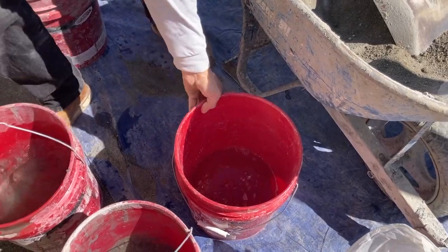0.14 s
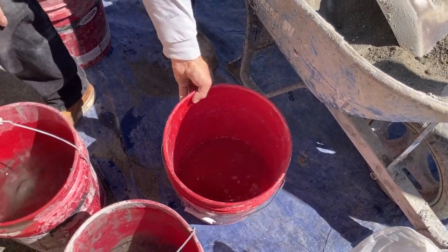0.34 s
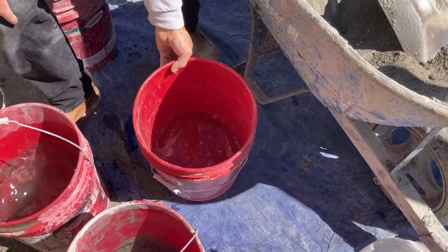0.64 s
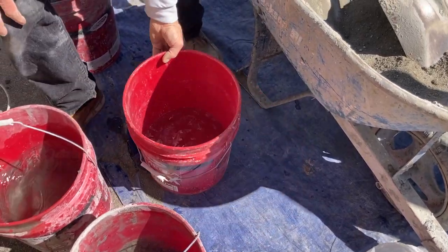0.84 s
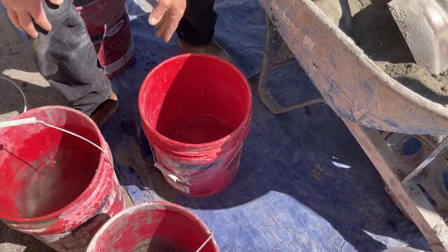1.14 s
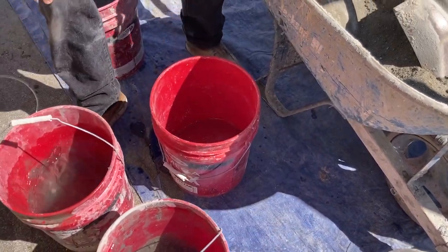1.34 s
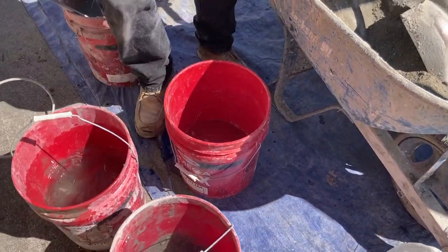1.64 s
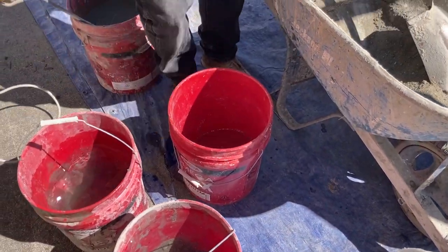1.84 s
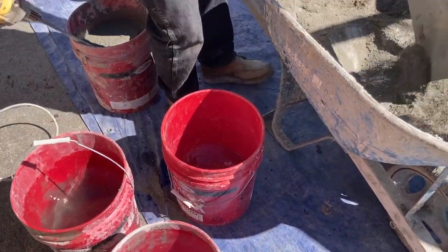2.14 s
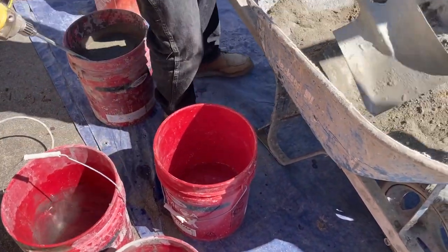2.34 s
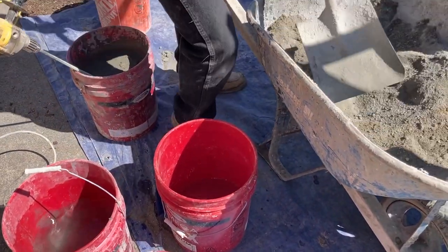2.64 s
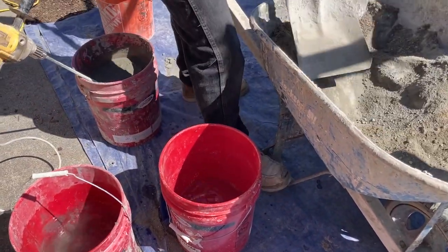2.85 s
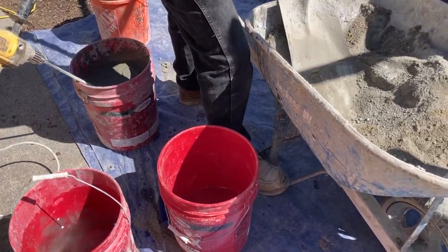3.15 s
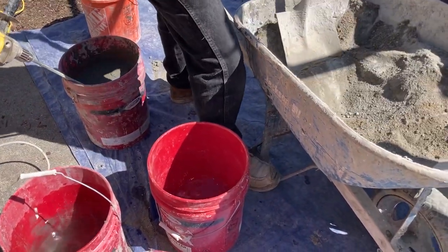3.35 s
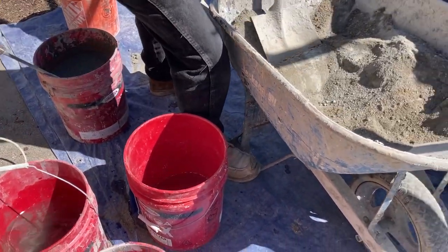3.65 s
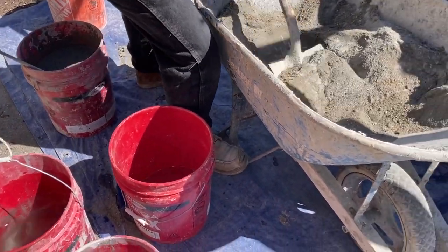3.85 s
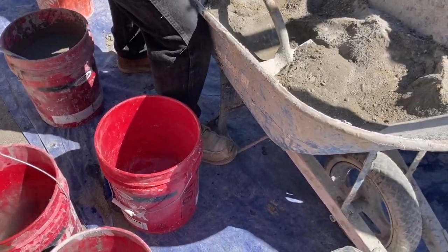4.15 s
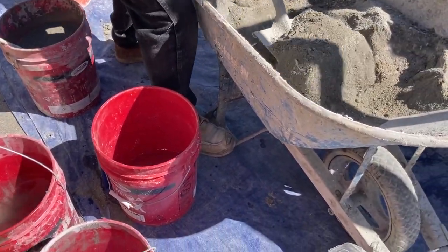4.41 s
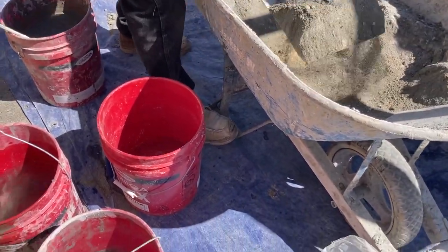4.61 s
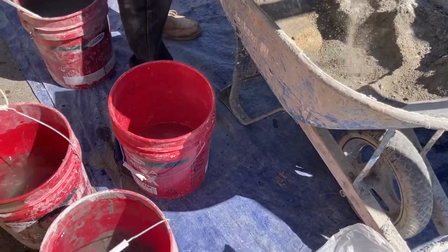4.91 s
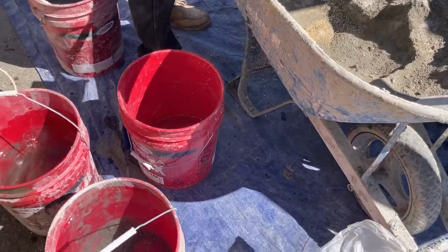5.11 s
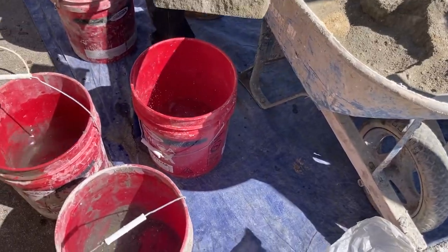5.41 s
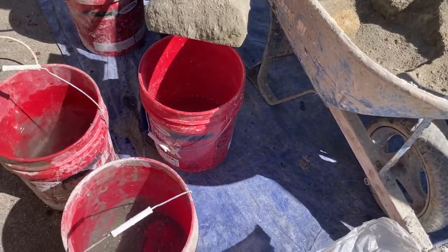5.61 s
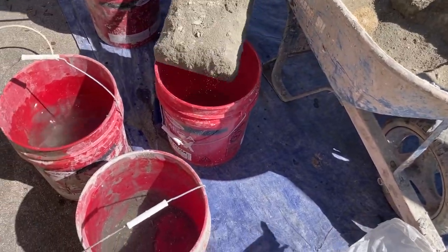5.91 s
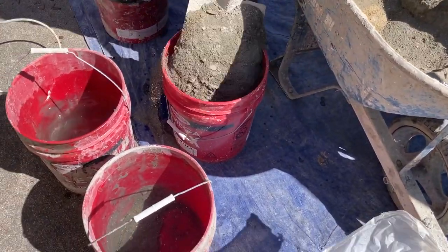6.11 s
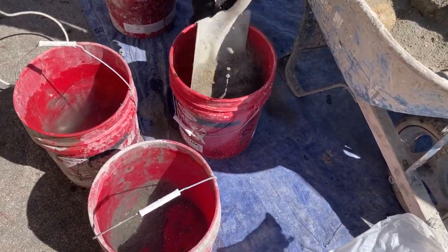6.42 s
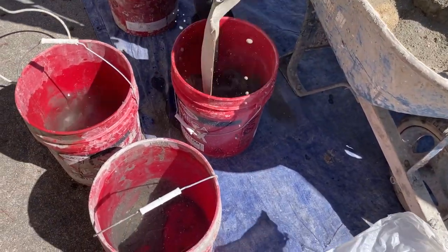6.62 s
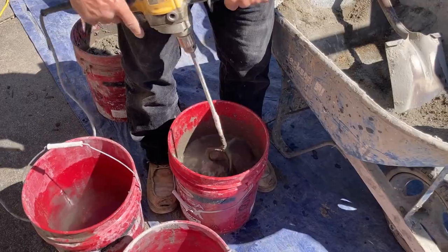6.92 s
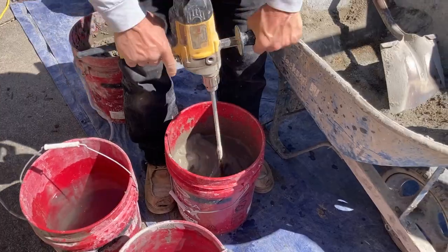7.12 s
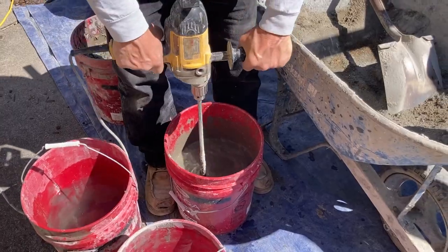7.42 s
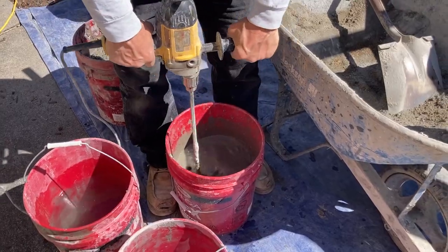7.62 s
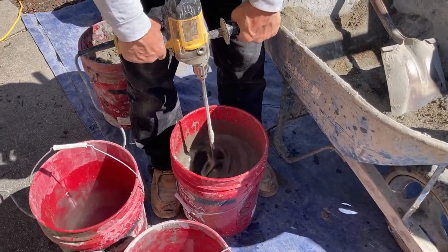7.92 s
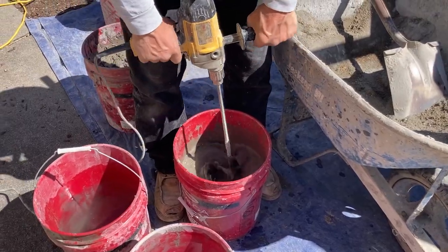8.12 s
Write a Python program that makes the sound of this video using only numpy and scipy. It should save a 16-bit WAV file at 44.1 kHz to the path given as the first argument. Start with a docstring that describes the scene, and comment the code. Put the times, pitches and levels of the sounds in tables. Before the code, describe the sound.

Close, dry outdoor sound with faint distant wash and a low breeze that fades after about 4 s. From 0 to 0.3 s, things scuff over gritty ground. At 0.7 s a plastic bucket lands with a hollow, ringing knock, rocking and settling until 0.93 s. Soft drags and dull thuds follow, with heavier scrapes at 1.7-2.4 s. Around 3.1 s a shovel hits with a loud, overloaded clack and brief squeak, again at 3.26 s, then digs with a coarse crunch at 3.6-3.9 s. A short heave scrapes at 4.65 s; grains click and patter from 5.1 to 5.7 s. At 5.92 s the blade chatters on the bucket rim, and sand slides in at 6.1-6.4 s with wet, boomy plops until 6.8 s. From 6.85 s a drill whirs, slows near 7.5 s, then revs to a peak around 8 s, paddle churning and slapping slurry to the end.

```python
"""Outdoors in a yard, mortar is mixed close to the microphones. A plastic bucket with a little water is
set down on a tarp, a shovel stabs and digs into gritty sand in a wheelbarrow, and the load slides into the
bucket. Then a drill with a mixing paddle runs up and churns the slurry. Scrapes and blows are streams of tiny
clicks and hiss, filtered to sound like each object; squeaks, thuds and gears are tones. Loud peaks overload."""
import sys
import numpy as np
from scipy import signal
from scipy.fft import rfft, irfft
from scipy.io import wavfile
from scipy.ndimage import uniform_filter1d

SR = 44100
rng = np.random.default_rng(int(sys.argv[2]) if len(sys.argv) > 2 else 0)


def inscribe(sig):
    """Save sig as 16-bit PCM at rate SR to the path in sys.argv[1].

    A 1-D sig is mono; a 2-D sig holds one channel per row.
    Samples are clipped to [-1, 1] before scaling.
    """
    pcm = np.round(np.clip(np.atleast_2d(sig).T, -1, 1) * 32767)
    wavfile.write(sys.argv[1], SR, pcm.astype(np.int16))


N = 364250
TIME = np.arange(N) / SR  # seconds
BINS = np.fft.rfftfreq(16384, 1 / SR)  # frequencies at which filters are drawn, Hz

# colour of falling sand and pebbles: (frequency [Hz], relative level [dB])
SPILL_TONE = [(520, -21), (900, -6), (1600, 3), (2800, 3.5), (4500, 12.5), (7000, 10.5), (11000, 12),
              (15500, 2)]
# colour of the wet slurry: (frequency [Hz], relative level [dB])
SLURRY_TONE = [(60, -44), (130, 3), (210, -10.5), (300, -2.5), (520, -0.5), (900, -6.5), (1600, 2.5),
               (2800, -11), (4500, -12.5), (7000, -11), (11000, -10.5), (15500, -17.5)]
# resonances of the air above the slurry: (frequency [Hz], width [Hz], boost [dB])
CAVITY = [(321.6, 53, 23), (795, 63, 17.5), (1415, 140, 4.5), (2083, 61, 6.5), (3500, 200, 10)]


def amp(db):
    """Turns decibels into a plain factor."""
    return 10 ** (np.asarray(db) / 20)


def unit(x):
    """Scales a signal to an rms of 1."""
    return x / np.sqrt(np.mean(x ** 2) + 1e-20)


def read(points, hz):
    """Joins the points of a curve by straight lines over log frequency."""
    f, value = np.transpose(points)
    return np.interp(np.log(hz + 1), np.log(f + 1), value)


def wander(rate):
    """A smooth random curve of rms 1 that changes at up to about `rate` cycles per second."""
    size = 8192
    hz = np.fft.rfftfreq(size, N / SR / size)
    spectrum = rfft(rng.standard_normal(size)) / (1 + (hz / rate) ** 4)
    return unit(np.interp(TIME, np.linspace(0, N / SR, size), irfft(spectrum)))


def colour(x, gain):
    """Filters with unit energy and no early response: resonances ring on after what excites them."""
    log_gain = np.log(np.maximum(gain / gain.max(), 1e-5))
    circle = np.r_[log_gain, log_gain[-2:0:-1]]
    minimum_phase = np.exp(np.conj(signal.hilbert(circle)))
    taps = np.fft.ifft(minimum_phase).real[:len(BINS)]
    return signal.oaconvolve(x, taps / np.linalg.norm(taps))[:N]


def grains(per_s, spread_db, wash):
    """Random clicks of uneven size over a hiss of grains too fine to tell apart."""
    size = amp(spread_db * np.minimum(rng.exponential(1, N), 4))
    happens = rng.random(N) < per_s / SR
    clicks = size * rng.choice([-1, 1], N) * happens
    return unit(unit(clicks) + wash * rng.standard_normal(N))


def swell(s, length, attack_s, sag_db, release_s, trickle_db):
    """A motion gathers speed, sags while it lasts and stops, leaving a faint trickle."""
    trickle_s = .13
    t = TIME - s
    late = np.maximum(t - length, 0)
    trickle = amp(trickle_db)
    release = (np.exp(-late / release_s) + trickle * np.exp(-late / trickle_s)) / (1 + trickle)
    attack = np.clip(t / attack_s, 0, 1) ** 2
    sag = amp(-sag_db * np.clip(t / length, 0, 1))
    return attack * sag * release


def strokes(rows, **shape):
    """Body and grit force of sliding motions that share one shape."""
    force = np.zeros((2, N))
    for s, length, body_db, grit_db in rows:
        force += np.outer(amp([body_db, grit_db]), swell(s, length, **shape))
    return force


def blows(rows, length_s=None, fade_s=0.0039):
    """Body and grit force of impacts: a quick crush that holds, then dies; longer blows die more slowly."""
    force, t = np.zeros((2, N)), TIME[:SR // 2]
    for s, body_db, grit_db, *own_length in rows:
        hold = own_length[0] if own_length else length_s
        part = force[:, round(s * SR):][:, :len(t)]
        shape = np.exp(-np.maximum(t - hold, 0) / (fade_s + 0.79 * hold))
        part += np.outer(amp([body_db, grit_db]), shape[:part.shape[1]])
    return uniform_filter1d(force, size=110, axis=1)  # rounds the corners over 2.5 ms


def sound(force, drive, tone, modes=()):
    """Grains under a force excite an object: its body below the split, fine grit above."""
    split_hz, bass_hz = 2500, 86
    ring = 1
    for hz, width, db in modes:
        ring = ring + amp(db) ** 2 / (1 + (2 * (BINS - hz) / width) ** 2)
    gain = amp(read(tone, BINS)) * np.sqrt(ring)
    gain = gain * BINS ** 2 / (BINS ** 2 + bass_hz ** 2)  # small objects radiate little bass
    low = 1 / (1 + (BINS / split_hz) ** 8)
    body = colour(drive * force[0], gain * np.sqrt(low))
    grit = colour(drive * force[1], gain * np.sqrt(1 - low))
    return body + grit


def shifting(x, patchy_db):
    """Hollows open and close as the material moves: random patches of time and pitch grow or weaken."""
    z = signal.stft(x, nperseg=512)[2]
    patches = uniform_filter1d(rng.standard_normal(z.shape), size=3, axis=0)
    patches = unit(uniform_filter1d(patches, size=6, axis=1))
    return signal.istft(z * unit(amp(patchy_db * patches)), nperseg=512)[1][:N]


def distant_air():
    """Distant outdoor wash: filtered noise whose level wanders slightly."""
    # colour of the wash: (frequency [Hz], relative level [dB])
    air_tone = [(50, -7), (120, -3), (190, -12), (300, 3), (520, 4.5), (900, -8.5), (1600, -13),
                (2800, -15), (4500, -18.5), (7000, -21), (11000, -20), (15500, -28)]
    wash = colour(rng.standard_normal(N), amp(read(air_tone, BINS)))
    return wash * amp(-45 + 0.81 * wander(6.6))


def breeze():
    """A breeze makes a separate low, gusty rumble in each channel and dies down."""
    # (frequency [Hz], relative level [dB])
    rumble_tone = [(15, -2), (35, -7), (60, 8.5), (100, -9.5), (200, -11.0), (800, -66)]
    rumble = amp(read(rumble_tone, BINS))
    gusts = []
    for _ in range(2):
        gusts.append(colour(rng.standard_normal(N) * amp(5.3 * wander(8.1)), rumble))
    level_db = np.interp(TIME, [0, 2.6, 4.2, 8.2], [-47.5, -43, -51.5, -52])
    return np.array(gusts) * amp(level_db)


def drags():
    """Things scuff and drag over sandy ground and through the barrow: uneven streams of grains."""
    # the drags: (start [s], length [s], body level [dB], grit level [dB])
    drag_rows = [(0.0, 0.043, -37.5, -44), (.105, 0.19, -36.5, -36), (.49, 0.21, -50.5, -60),
                 (.96, 0.068, -45, -43.5), (1.2, 0.53, -53, -49.5), (1.645, 0.089, -39, -39.5),
                 (1.715, 0.21, -28, -34.5), (1.955, 0.16, -31, -34.5), (2.14, 0.31, -39, -33),
                 (2.71, 0.2, -41, -38.5), (3.52, 0.074, -35.5, -34.5), (4.52, 0.29, -49, -54)]
    # their colour: (frequency [Hz], relative level [dB])
    drag_tone = [(190, 0.5), (300, 2), (520, 9), (900, 5), (1600, 4), (2800, -13), (4500, -14),
                 (7000, -15.5), (11000, -14.5), (15500, -23.5)]
    force = strokes(drag_rows, attack_s=0.027, sag_db=2, release_s=0.034, trickle_db=-12)
    drive = grains(1800, spread_db=4, wash=.6) * amp(2 * wander(40))
    return sound(force, drive, drag_tone)


def squeaks():
    """Steel catches on grit: each catch sets off a short tone of unsteady pitch and strength."""
    # (time [s], level [dB], frequency [Hz], width [Hz], hold [s], decay [s])
    catches = [(0.317, -31, 1140, 120, 0.0088, 0.0045), (3.074, 0.5, 2780, 103, 0.0041, 0.0018),
               (4.544, -35.5, 890, 201, 0.12, .02), (4.651, -15.5, 1403, 300, 0.0086, 0.005),
               (4.738, -18, 796, 302, 0.013, 0.0079), (6.092, -27.5, 1465, 131, 0.15, .02),
               (6.182, -21, 4620, 129, 0.0067, 0.0036), (6.614, -19, 2210, 200, 0.02, 0.0064),
               (6.923, -20, 4190, 110, 0.0059, 0.0057)]
    out, t = np.zeros(N), TIME[:SR // 3]
    for s, db, hz, width, hold, decay in catches:
        drift = signal.lfilter([1], [1, -.99], rng.standard_normal(len(t)))
        turns = np.cumsum(hz + .5 * width * unit(drift)) / SR
        shape = np.exp(-np.maximum(t - hold, 0) / decay) * np.minimum(t / 0.0053, 1)
        out[round(s * SR):][:len(t)] += amp(db) * shape * np.sin(2 * np.pi * turns)
    return out * unit(1 + .8 * wander(400))


def thuds():
    """Boots and loads thud dully: short, low swings of the ground as fading sine waves."""
    # (time [s], level before the fades [dB], frequency [Hz], decay [s])
    thud_rows = [(0.46, -23, 60.5, 0.013), (0.514, -14.5, 78, 0.011), (0.906, -6, 127, 0.011),
                 (0.903, 4, 232, 0.0044), (1.09, -22, 63.7, 0.039), (2.14, -30, 84, 0.022),
                 (2.305, -20, 78, 0.011), (2.565, -19.5, 64.3, 0.012), (3.085, 11.5, 175, 0.012)]
    out = np.zeros(N)
    for s, db, hz, decay in thud_rows:
        t = np.maximum(TIME - s, 0)
        fades = np.exp(-t / decay) * (1 - np.exp(-t / 0.0065))
        out += amp(db) * np.sin(2 * np.pi * hz * t) * fades
    return out


def bucket_modes():
    """The bucket's ringing pitches, as excited by a blow on its base and by one on its rim."""
    # (frequency [Hz], width [Hz], boost when the base is struck [dB], boost when the rim is struck [dB])
    bucket_rows = [(334.4, 10, 8.5, 15.5), (552, 52, 5, 24), (778, 18, 20.5, 11.5), (1015, 18, -6, 20),
                   (1340, 41, -24, 9), (1460, 120, 17, 3), (2074, 130, 13, 9), (3050, 76, 14.5, 6),
                   (6520, 80, -13, 17)]
    modes = np.array(bucket_rows)
    return modes[:, :3], np.delete(modes, 2, axis=1)


def knocks():
    """The bucket lands, rocks and settles: blows on its base make it ring."""
    # (time [s], body level [dB], grit level [dB], length [s])
    knock_rows = [(.684, -31, -33.5, 0.021), (.706, -3.5, -26, 0.019), (.742, -19, -28, 0.0058),
                  (.762, -11, -28, 0.0037), (.785, -35.5, -40.5, 0.073), (.828, -24.5, -53, 0.0024),
                  (.88, -29, -42, 0.023), (.926, -29.5, -49.5, 0.024)]
    # colour of a blow on the base: (frequency [Hz], relative level [dB])
    knock_tone = [(50, -34), (130, 3), (230, 5.5), (400, 1.5), (650, -3.5), (1500, -12), (2200, -16),
                  (2900, -23), (4500, -16.5), (7000, -19), (11000, -18), (15500, -27)]
    base_modes, _ = bucket_modes()
    return sound(blows(knock_rows), grains(2500, spread_db=0.74, wash=0.56), knock_tone, base_modes)


def pebbles():
    """Single pebbles drop and click: very brief bursts of dense grains."""
    # (time [s], body level [dB], grit level [dB])
    pebble_rows = [(1.011, -49, -26), (2.214, -28, -20), (4.181, -33, -39), (4.271, -29.5, -36),
                   (4.995, -62, -30), (5.113, -40, -18), (5.133, -24, -25), (5.175, -26, -13),
                   (5.37, -24, -44), (5.402, -22, -30), (5.711, -22, -31.5), (5.847, -44, -37.5)]
    force = blows(pebble_rows, length_s=0.00065, fade_s=0.00097)
    return sound(force, grains(13000, spread_db=5.6, wash=0.26), SPILL_TONE)


def stabs():
    """The shovel's blade meets sand and stones: short blows with one broad resonance."""
    # (time [s], body level [dB], grit level [dB], length [s])
    stab_rows = [(1.36, -33, -34, 0.0078), (2.602, -29, -38.5, 0.027), (2.887, -22.5, -53, 0.0059),
                 (3.048, -38, -24.5, 0.015), (3.076, -5.5, -11, 0.0016), (3.087, -18, -33, .016),
                 (3.259, 0, -4, 0.012), (3.385, -30, -40, 0.011), (3.568, -19.5, -20, 0.01),
                 (3.604, -15, -18, 0.024), (3.974, -19.5, -17, 0.0058)]
    # colour of the blade in sand: (frequency [Hz], relative level [dB])
    stab_tone = [(50, -38), (120, -2), (190, 0), (300, 4), (520, 2), (900, -4), (1600, -12.5),
                 (2800, -13.5), (4500, -16.5), (7000, -15.5), (11000, -13.5), (15500, -23.5)]
    drive = grains(5000, spread_db=1.5, wash=0.42)
    return sound(blows(stab_rows), drive, stab_tone, [(1670, 210, 9.4)])


def digs():
    """The blade is pushed into the heap: dense, uneven grains excite four resonances."""
    # (start [s], length [s], body level [dB], grit level [dB])
    dig_rows = [(3.1, 0.11, -30.5, -27.5), (3.19, 0.095, -29, -21), (3.58, 0.22, -7.5, -6.5),
                (3.79, 0.088, -8, -9.5)]
    # colour of digging: (frequency [Hz], relative level [dB])
    dig_tone = [(50, -25), (120, -6), (190, 4.5), (300, 10.5), (520, 6), (900, 1.5), (1600, -7),
                (2800, -18), (4500, -18.5), (7000, -18.5), (11000, -14), (15500, -26)]
    # (frequency [Hz], width [Hz], boost [dB])
    modes = [(293, 34, 1.2), (620, 46, 5.9), (1550, 210, 3.7), (3330, 130, 1.2)]
    force = strokes(dig_rows, attack_s=0.027, sag_db=0.0, release_s=0.01, trickle_db=-28)
    drive = grains(6000, spread_db=4.1, wash=0.55) * amp(1.4 * wander(45))
    return sound(force, drive, dig_tone, modes)


def lifts():
    """Heaves break the load free: short scrapes that start fast and sag."""
    # (start [s], length [s], body level [dB], grit level [dB])
    lift_rows = [(4.643, 0.1, -19.5, -31.5), (4.731, 0.026, -11, -30), (4.762, 0.034, -14.5, -27)]
    # colour of the heaves: (frequency [Hz], relative level [dB])
    lift_tone = [(120, -10), (190, -3), (300, -2.5), (520, 3.5), (900, -1.5), (1600, -5.5), (2800, -11),
                 (4500, -14), (7000, -14), (11000, -14), (15500, -25)]
    force = strokes(lift_rows, attack_s=0.0089, sag_db=6.5, release_s=0.021, trickle_db=-28.5)
    drive = grains(2500, spread_db=3.7, wash=0.92) * amp(1.2 * wander(60))
    return sound(force, drive, lift_tone)


def spills():
    """Sand falls off the blade onto the tarp: a bright patter of uneven grains."""
    # (start [s], length [s], body level [dB], grit level [dB])
    spill_rows = [(5.108, .21, -41, -32), (5.35, 0.18, -40, -36), (5.61, 0.035, -53, -43.5)]
    force = strokes(spill_rows, attack_s=0.0093, sag_db=2, release_s=0.047, trickle_db=-20)
    return sound(force, grains(1400, spread_db=5.8, wash=0.75), SPILL_TONE)


def rim_hits():
    """The shovel chatters on the bucket's rim and makes the bucket ring."""
    # (time [s], body level [dB], grit level [dB], length [s])
    rim_rows = [(5.918, -18, -22, 0.0046), (5.927, -4, -20.5, 0.015), (5.955, -3, -16, 0.0016),
                (5.97, -12, -16.5, 0.014), (6.021, -21, -26.5, 0.0075)]
    # colour of a blow on the rim: (frequency [Hz], relative level [dB])
    rim_tone = [(50, -37), (130, 4), (300, -2), (480, -9.5), (800, 3), (1600, 1), (2200, -7), (2900, -19.5),
                (4500, -26), (7000, -30), (11000, -34), (15500, -38)]
    _, rim_modes = bucket_modes()
    return sound(blows(rim_rows), grains(2500, spread_db=1, wash=0.44), rim_tone, rim_modes)


def pours():
    """The blade tips, the load hisses into the bucket, and the rest follows."""
    # (start [s], length [s], body level [dB], grit level [dB])
    pour_rows = [(6.03, 0.11, -45, -34.5), (6.13, 0.25, -18.5, -19), (6.6, 0.22, -37, -44)]
    # colour of the sliding load: (frequency [Hz], relative level [dB])
    pour_tone = [(120, -2.5), (190, 7), (300, -0.5), (520, 7), (900, 1), (1600, -2), (2800, -3),
                 (4500, -6.5), (7000, -8), (11000, -7), (15500, -16.5)]
    force = strokes(pour_rows, attack_s=0.06, sag_db=0.0, release_s=0.17, trickle_db=-18)
    drive = grains(5000, spread_db=4.5, wash=0.65)
    return sound(force, drive, pour_tone, [(314, 82, 2.4), (1370, 230, 6)])


def plops():
    """Wet lumps land in the bucket: short blows boom in the air above the slurry."""
    # (time [s], body level [dB], grit level [dB])
    plop_rows = [(6.182, -13, -22), (6.205, -23, -34), (6.365, -2.5, -28), (6.38, -10, -36),
                 (6.408, -12.5, -36), (6.615, -19.5, -27), (6.657, -11.5, -25), (6.701, -16, -39),
                 (6.775, -24, -20)]
    # colour of a wet lump: (frequency [Hz], relative level [dB])
    plop_tone = [(50, -38), (130, 6), (220, 11), (320, 0.5), (480, 7), (800, -3.5), (1500, 8), (2200, 1.5),
                 (2900, -21), (4500, -18), (11000, -21), (15500, -44)]
    force = blows(plop_rows, length_s=0.0071)
    return sound(force, grains(2500, spread_db=1.1, wash=0.5), plop_tone, CAVITY)


def motor():
    """The drill's speed [Hz], the strength of its whine, and a quick fade-in as it starts."""
    # the motor coasts, runs up and sags: (time [s], speed [Hz], whine level [dB])
    motor_rows = [(6.84, 295, -23), (7.05, 222, -28), (7.2, 192, -41), (7.5, 152, -23), (7.62, 260, -16),
                  (7.8, 365, -20), (7.99, 523, -18), (8.12, 468, -16), (8.26, 422, -16)]
    s, speed, whine_db = np.transpose(motor_rows)
    running = np.clip((TIME - s[0]) / 0.0067, 0, 1)
    return np.interp(TIME, s, speed), amp(np.interp(TIME, s, whine_db)), running


def whistle(hz, width):
    """Noise in one narrow resonance."""
    return colour(rng.standard_normal(N), 1 / (1 + ((BINS - hz) / width) ** 2))


def drill():
    """Gear and fan tones follow the motor, blurred by rattling teeth; the housing sings as a narrow hiss."""
    # gear and fan tones: (multiple of the motor's speed [-], level [dB])
    gear_tones = [(3, -10), (4, -11), (5, -17), (6, -1.5), (7, -14), (9, -3.5), (12, -13), (15, -12),
                  (18, -19)]
    # the housing sings under the half-pulled trigger: (start [s], length [s], level [dB])
    housing_row = (6.85, .31, -28.5)
    speed, whine, running = motor()
    turns = np.cumsum(speed * (1 + .018 * wander(140))) / SR
    gears = np.zeros(N)
    for order, db in gear_tones:
        rattle = .55 + .6 * (wander(120) + 1j * wander(120))  # shakes both strength and phase
        gears += amp(db) * (rattle * np.exp(2j * np.pi * round(order) * turns)).real
    s, length, housing_db = housing_row
    singing = swell(s, length, attack_s=0.14, sag_db=8, release_s=0.053, trickle_db=-18)
    housing = whistle(3480, 71) * amp(housing_db) * singing
    return gears * amp(-2.5) * whine * running + housing


def churning():
    """The paddle churns lumps that boom in the bucket; the faster it turns, the more grit it throws."""
    # how hard the paddle churns the thickening slurry: (time [s], level [dB])
    churn_rows = [(6.85, -19.5), (6.95, -17.5), (7.04, -32.5), (7.3, -19.5), (7.5, -15), (7.86, -15.5),
                  (8.01, -9), (8.26, -13.5)]
    working_hz, spray_db, spray_db_per_octave = 400, -19.5, 8.5  # grit level at this speed, and its rise
    speed, _, running = motor()
    body_db = np.interp(TIME, *np.transpose(churn_rows))
    grit_db = spray_db + spray_db_per_octave * np.log2(speed / working_hz)
    drive = grains(2500, spread_db=3.24, wash=0.91) * amp(1.54 * wander(36))
    return sound(running * amp([body_db, grit_db]), drive, SLURRY_TONE, CAVITY)


def slaps():
    """The paddle slaps through the slurry: short blows boom in the air above it."""
    # (time [s], body level [dB], grit level [dB])
    slap_rows = [(6.852, -24, -24), (6.928, -14, -19.5), (6.955, -18, -35), (7.093, -18.5, -27),
                 (7.165, -11, -21), (7.181, -10.5, -40), (7.262, -25, -20.5), (7.325, -12, -45),
                 (7.622, -9, -19.5), (7.788, -8, -31), (7.87, -4, -30), (7.915, -7, -27), (8.001, 1.5, -33),
                 (8.027, -1.5, -28), (8.208, -7.5, -16)]
    force = blows(slap_rows, length_s=0.0049)
    return sound(force, grains(2000, spread_db=2.9, wash=0.25), SLURRY_TONE, CAVITY)


def yard(x):
    """Short scattered reflections from the ground, buckets and barrow.

    Two random echo patterns fade in and out in turn, so left and right differ and the colour keeps changing.
    """
    # strength of the reflections: (frequency [Hz], level against the direct sound [dB])
    yard_tone = [(100, -3), (200, -12), (400, -12), (1000, -3), (2300, -5.5), (4500, 0), (9000, -12.5),
                 (15000, -9.5)]
    t, angle = TIME[:SR // 2], 2 * np.pi * 3 * TIME  # three rounds a second
    decay = amp(-60 * t / 0.036) + amp(-36 - 60 * t / 0.81)  # a dense start and a faint long tail
    wet = irfft(rfft(x) * amp(read(yard_tone, np.fft.rfftfreq(N, 1 / SR))), N)
    out = np.zeros((2, N))
    for share in (np.cos(angle), np.sin(angle)):
        taps = rng.standard_normal((2, len(t))) * decay * (t > .002)
        taps /= np.linalg.norm(taps, axis=1, keepdims=True)
        out += signal.oaconvolve((wet * share)[None], taps, axes=1)[:, :N]
    return out


def scene():
    """All sources are summed, then the left and right channels get different phase at each frequency."""
    # between the channels: (frequency [Hz], phase by which left leads [rad])
    channel_phase = [(90, 0), (125, -2.6), (180, -3), (225, -2.2), (275, -1), (350, -.35), (750, -.25),
                     (1100, .15), (2100, .1), (3100, 1.8), (4400, .2), (5700, 2.4), (6500, .1), (7400, -.3),
                     (8700, -3), (9500, -3.2), (10800, -6.1), (11700, -6.4), (13000, -9.3), (14500, -9.5),
                     (15400, -12.4)]
    scraping = shifting(drags() + lifts(), 3.5) + shifting(digs() + spills(), 2.2)
    shovel = scraping + stabs() + pebbles() + squeaks()
    bucket = knocks() + rim_hits() + plops() + pours()
    mixer = shifting(churning(), 3.5) + slaps() + drill()
    direct = shovel + bucket + mixer + thuds() + distant_air()
    turn = np.exp(.5j * read(channel_phase, np.fft.rfftfreq(N, 1 / SR)))
    stereo = irfft(rfft(direct) * np.array([turn, turn.conj()]), N)
    return (stereo + yard(direct) + breeze()) * amp([[.35], [-.35]])  # left a little louder


def record(dry):
    """Loud peaks flatten against full scale; then the highest treble is cut off."""
    edge_hz = 15900
    clipped = dry / (1 + dry ** 6) ** (1 / 6)
    lowpass = signal.firwin(511, edge_hz, window=("kaiser", 8), fs=SR)
    return signal.oaconvolve(clipped, lowpass[None], "same")


dry = scene()
out = record(dry)
inscribe(out)
```